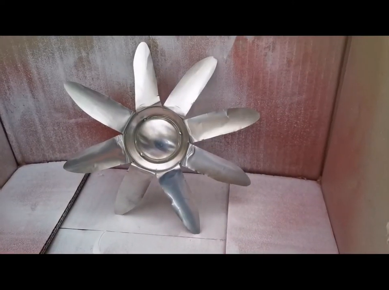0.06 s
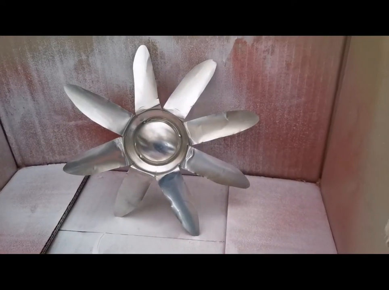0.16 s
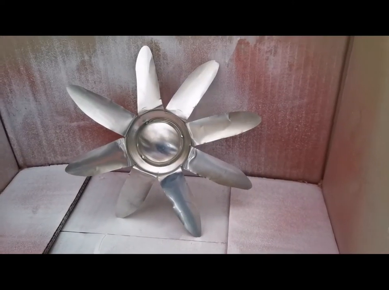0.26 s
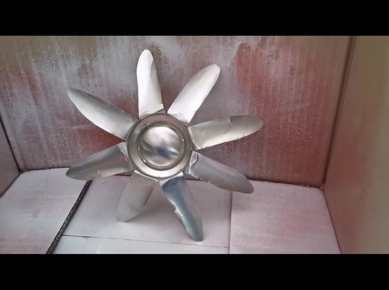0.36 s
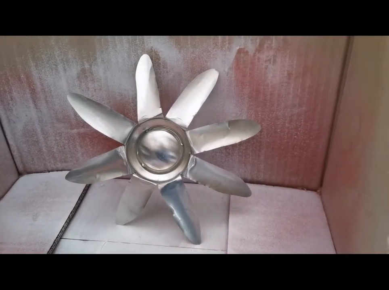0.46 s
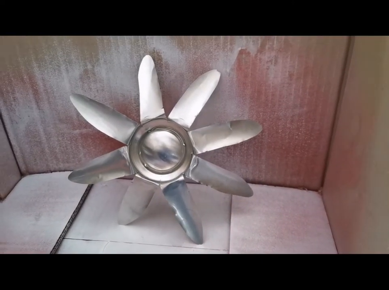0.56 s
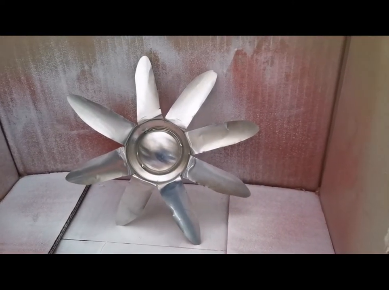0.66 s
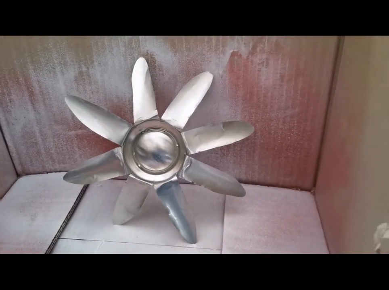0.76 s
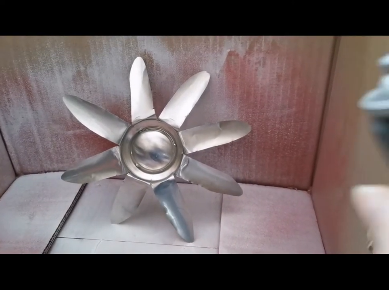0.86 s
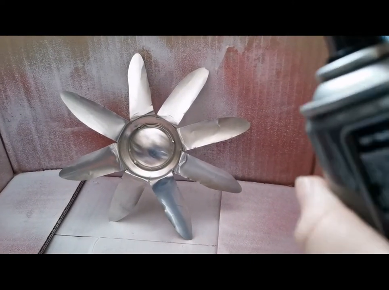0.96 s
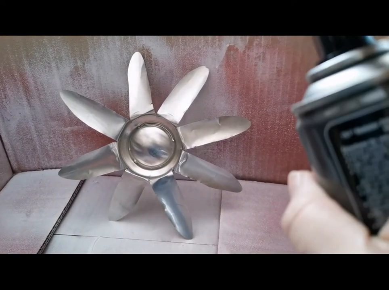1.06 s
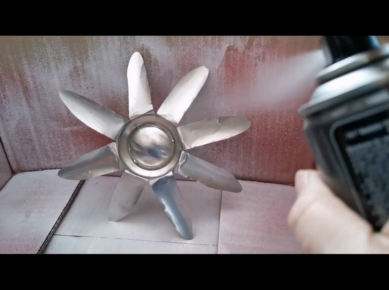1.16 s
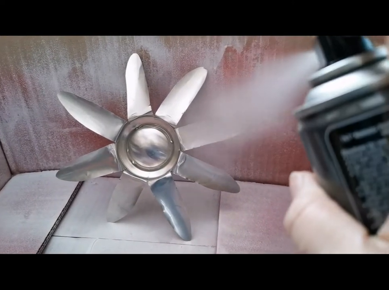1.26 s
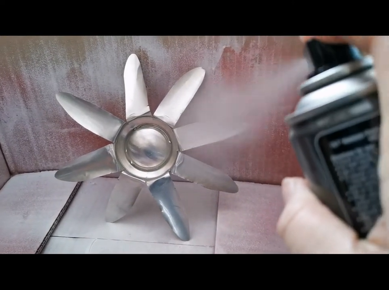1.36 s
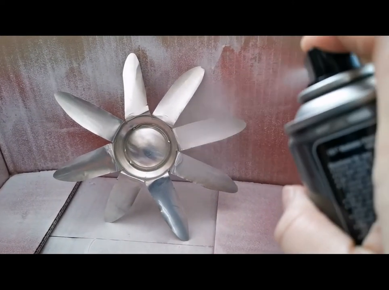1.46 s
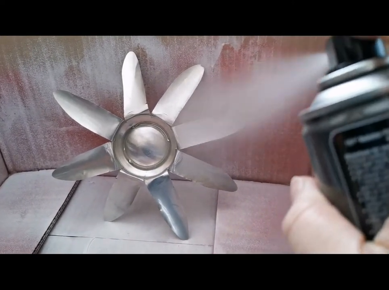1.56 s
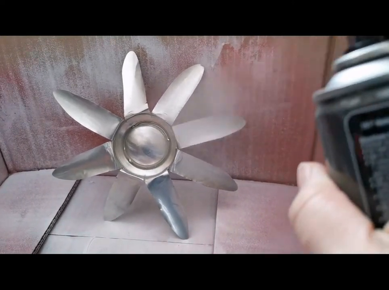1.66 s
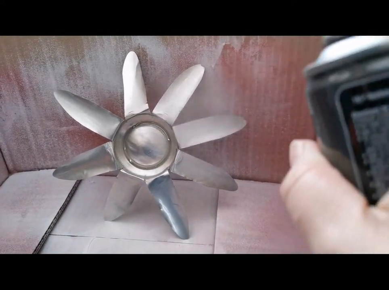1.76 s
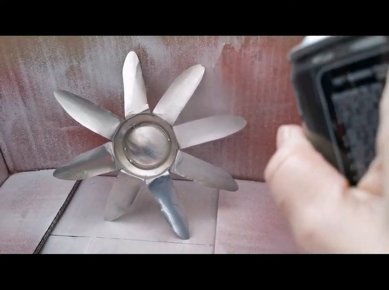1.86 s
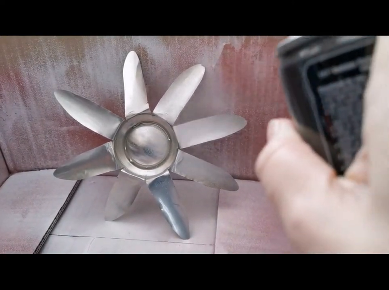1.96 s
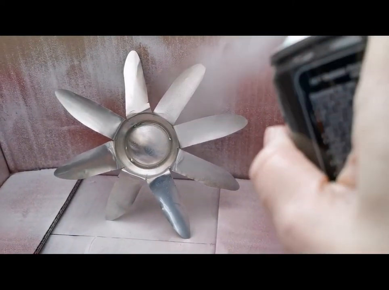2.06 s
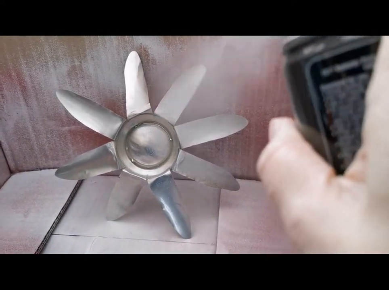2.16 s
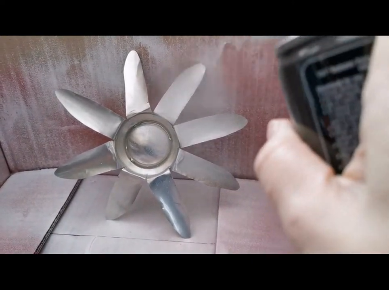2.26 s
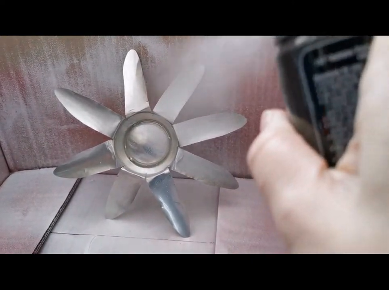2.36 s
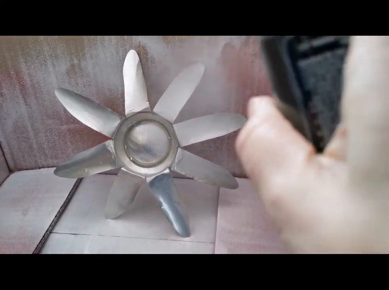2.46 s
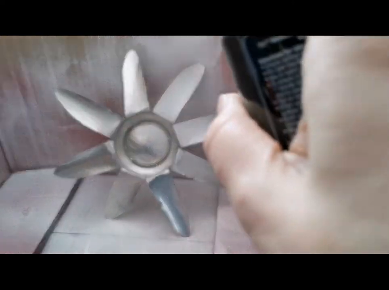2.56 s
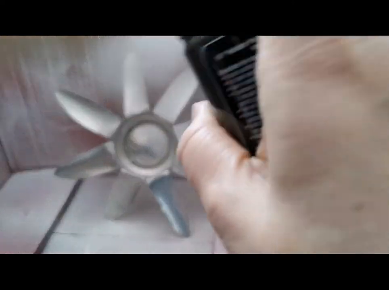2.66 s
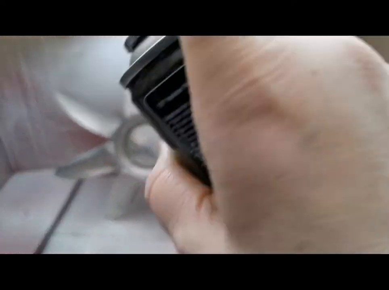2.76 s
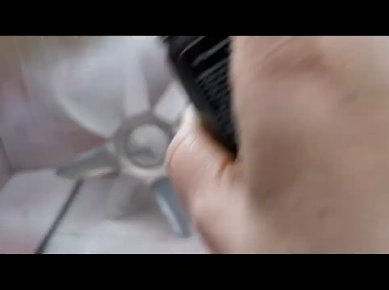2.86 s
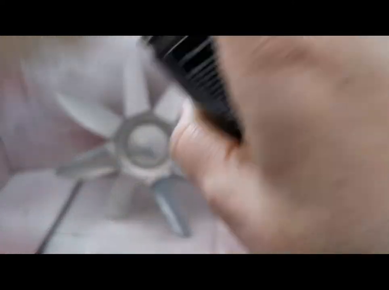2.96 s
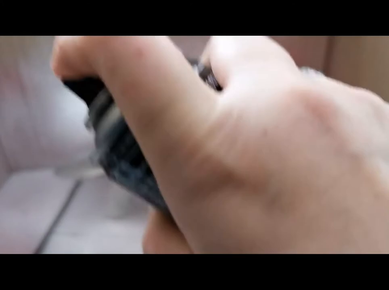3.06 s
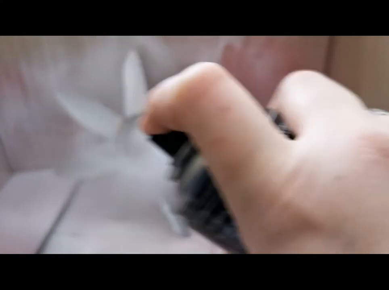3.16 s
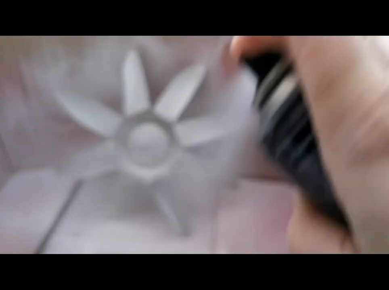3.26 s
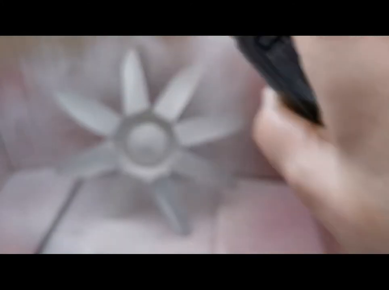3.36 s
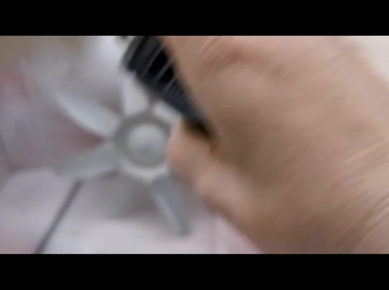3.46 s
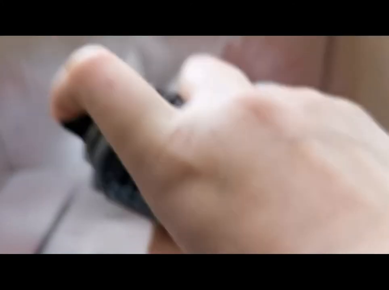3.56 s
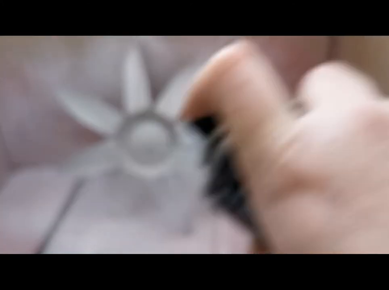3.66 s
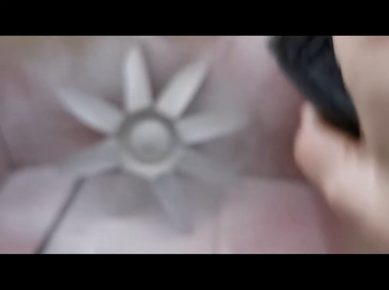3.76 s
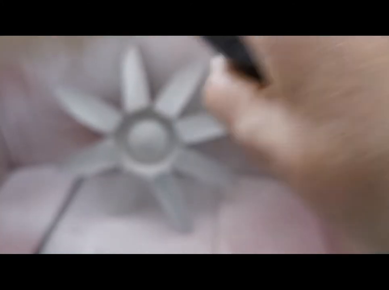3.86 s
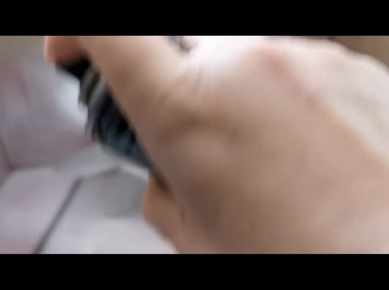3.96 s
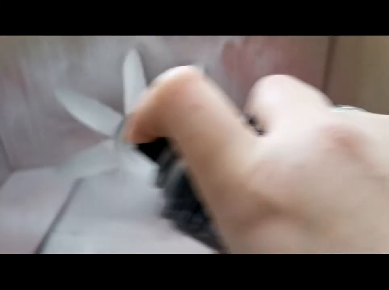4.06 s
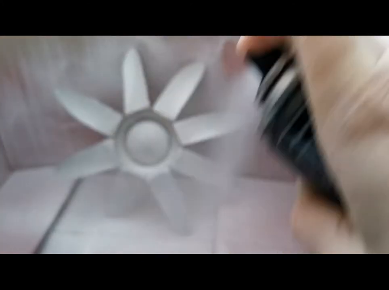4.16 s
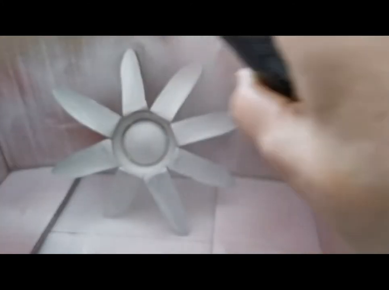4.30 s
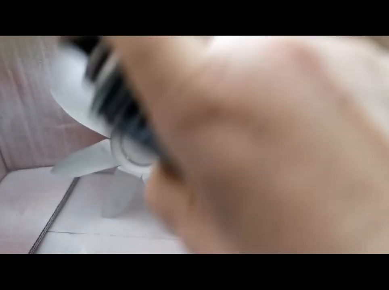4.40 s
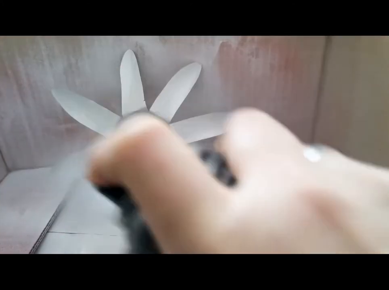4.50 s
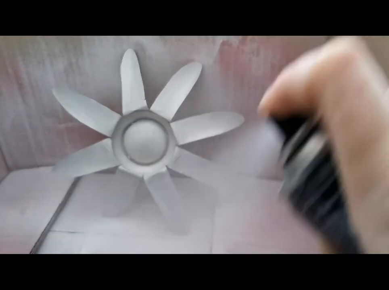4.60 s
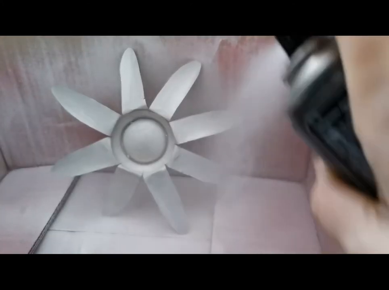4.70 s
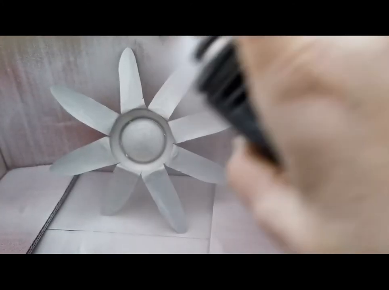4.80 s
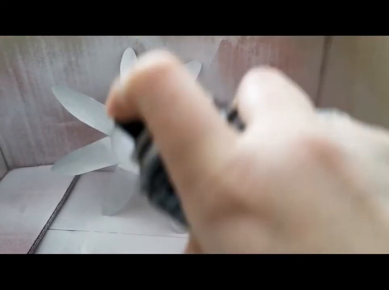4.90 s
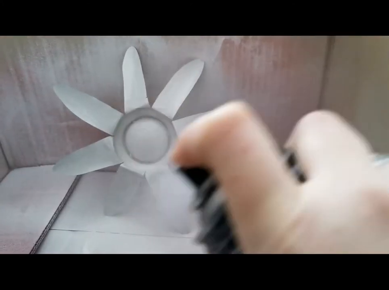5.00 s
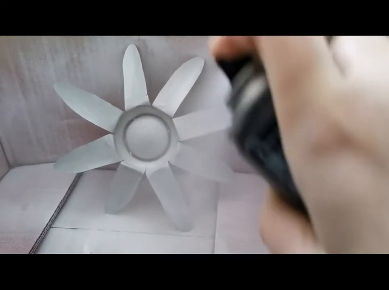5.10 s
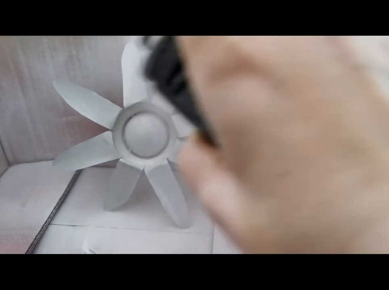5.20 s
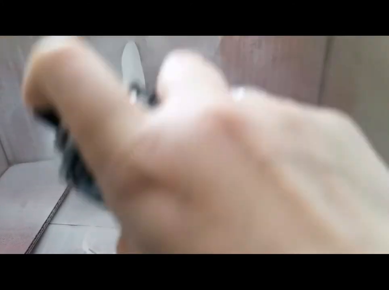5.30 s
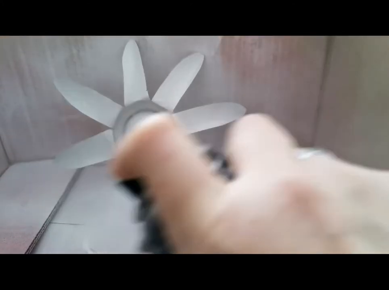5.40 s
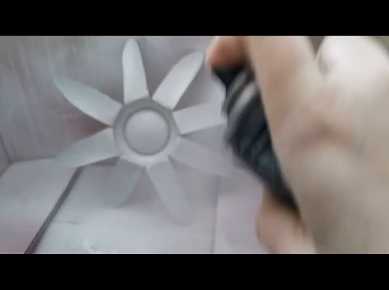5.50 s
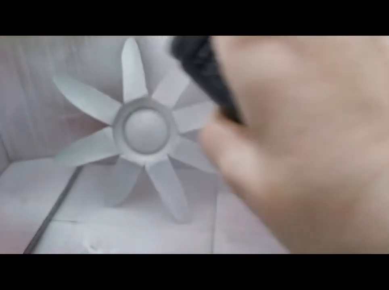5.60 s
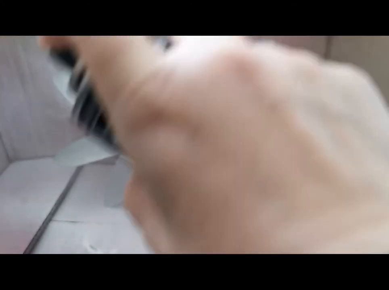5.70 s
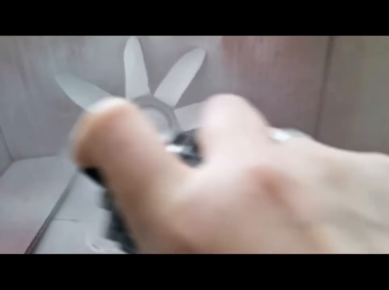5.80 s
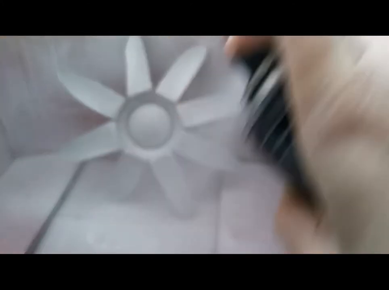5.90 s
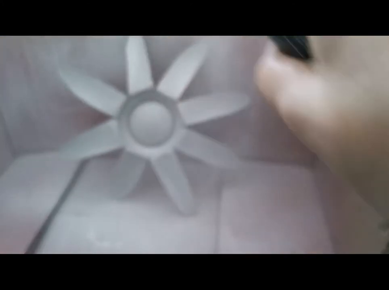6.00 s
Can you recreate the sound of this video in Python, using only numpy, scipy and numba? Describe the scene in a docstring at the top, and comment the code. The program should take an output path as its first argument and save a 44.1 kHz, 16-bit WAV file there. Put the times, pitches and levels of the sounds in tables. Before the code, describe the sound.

A spray can is shaken with a quick metallic ball rattle, gives four short hissing bursts, then sprays on steadily in sweeping strokes inside a box.

```python
"""Spray can in a cardboard box

A can is shaken so its ball rattles, gives four short bursts, then sprays on into a box, swept near a phone.
Jet: banded noise with two moving ridges, wall echoes and aimed treble; mist and buffeting: low box noise.
Ball: noise bursts, each with a rattle through can modes; slosh: flickering noise; valve: a falling whistle.
A rough squeak (narrow noise bands) leads in; hum and room noise lie under. Two ports colour jet and ball.
"""
import sys
import numpy as np
from scipy import signal
from scipy.fft import rfft, irfft
from scipy.io import wavfile
from scipy.ndimage import uniform_filter1d
from numba import njit

SR = 44100
rng = np.random.default_rng(int(sys.argv[2]) if len(sys.argv) > 2 else 0)


def digitize_waveform(pressure):
    """Quantize a signal to 16-bit integers and store it at the path in sys.argv[1].

    Rows of a 2-D input are taken as channels; values are limited to [-1, 1].
    """
    field = np.atleast_2d(pressure).T
    bounded = np.clip(field, -1, 1)
    quanta = np.round(bounded * 32767).astype(np.int16)
    wavfile.write(sys.argv[1], SR, quanta)


N = 266532


def undb(db):
    """Amplitude gain of a level in dB."""
    return 10 ** (np.asarray(db) / 20)


def unit_rms(x):
    """Scale to RMS 1, all channels together."""
    return x / np.sqrt(np.mean(x ** 2))


def colour(x, points):
    """Filter by a response of (frequency [Hz], gain [dB]) points, linear in log frequency."""
    hz, db = np.transpose(points)
    f = np.arange(N // 2 + 1) * SR / N + 1
    return irfft(rfft(x) * undb(np.interp(np.log(f), np.log(hz), db)), N)


def band(x, hz, width_hz):
    """Two-pole resonance, gain 1 at the centre."""
    return signal.lfilter(*signal.iirpeak(hz, hz / width_hz, fs=SR), x)


@njit
def sweep_band(x, hz, width_hz):
    """State-variable band-pass whose centre moves."""
    y, b, l = np.empty(len(x)), 0., 0.
    for i in range(len(x)):
        g, k = np.tan(np.pi * hz[i] / SR), width_hz / hz[i]
        v = (b + g * (x[i] - l)) / (1 + g * (g + k))
        b, l, y[i] = 2 * v - b, l + 2 * g * v, k * v
    return y


def pair(alike_below_hz):
    """Noise at two ports: alike in the bass, unrelated above; the shared part reaches the left later."""
    shared, own = rng.standard_normal(N), rng.standard_normal((2, N))
    delay_samples = 8
    both = [np.roll(shared, delay_samples), shared]
    low = signal.lfilter(*signal.butter(1, alike_below_hz, fs=SR), both)
    high = signal.lfilter(*signal.butter(1, alike_below_hz, "high", fs=SR), own)
    return low + high


def walk(rate_hz):
    """Random levels held 1 / rate_hz and smoothed twice; spread near 1."""
    hold = int(SR / rate_hz)
    steps = np.repeat(rng.standard_normal(N // hold + 1), hold)
    return 1.576 * uniform_filter1d(uniform_filter1d(steps, hold), hold)[:N]


def read(table):
    """Columns of a curve at every sample; the first, in dB, is -140 outside the curve."""
    s, first, *rest = np.transpose(table)
    t = np.arange(N) / SR
    return [np.interp(t, s, first, -140, -140)] + [np.interp(t, s, c) for c in rest]


def sides(pan_db):
    """Left and right gains for a left-minus-right level."""
    return undb(np.array([pan_db, -pan_db]) / 2)


# microphone port responses: (frequency [Hz], gain [dB])
LEFT_PORT_RESPONSE = [(1150, -20), (1450, -7), (1900, 3.5), (2500, -0.5), (3200, 0.5), (4200, 0),
                      (6000, -0.5), (7700, -2), (9000, 1.5), (9800, 3.5), (10800, 8.5), (12000, -1.5),
                      (13200, 3.5), (14000, 0.5), (15500, 2.5)]
RIGHT_PORT_RESPONSE = [(1100, -13.5), (2000, -2), (2700, 1), (3300, -1), (4800, 2), (6500, 2), (7700, -3),
                       (9000, 2), (11000, 1.5), (15500, 4)]


def ports(x):
    """Each port has its own resonances; the mean of its response points is set to 0 dB."""
    heard = []
    for channel, response in zip(x, (LEFT_PORT_RESPONSE, RIGHT_PORT_RESPONSE)):
        heard.append(colour(channel, response) * undb(-np.mean(np.array(response)[:, 1])))
    return np.array(heard)


# squeak envelope: (time [s], level [dB])
SQUEAK_LEVEL = [(0.0, -68), (0.046, -60.5), (0.08, -64), (0.102, -75), (0.14, -69)]
# squeak bands: (frequency [Hz], width [Hz], relative level [dB])
SQUEAK_PARTIALS = [(2270, 150, 2), (4170, 76, -4.5), (4960, 110, -8)]


def squeak():
    """Faint rough squeak: noise in a few narrow bands."""
    bands = [undb(db) * unit_rms(band(rng.standard_normal((2, N)), hz, width_hz))
             for hz, width_hz, db in SQUEAK_PARTIALS]
    return undb(read(SQUEAK_LEVEL)[0]) * sum(bands)


# background level and lean, drops quickly near 0.3 s, returns by 0.9 s:
# (time [s], level [dB], left minus right [dB])
BACKGROUND_LEVEL = [(0.0, -62, -5), (0.27, -60.5, 0), (0.341, -77, 1), (0.74, -70.5, -2.5),
                    (0.9, -61.5, -0.5), (1.41, -63.5, 1.5), (2.02, -59, 4.5), (2.69, -59.5, 4),
                    (2.9, -68, 3.5), (3.5, -66.5, 3), (4.9, -63, -1), (6.04, -63, -2)]
# mains hum bands: (frequency [Hz], width [Hz], relative level [dB])
HUM_BANDS = [(49.1, 5.4, 2.5), (192.8, 10, -10)]
# room noise spectrum: (frequency [Hz], gain [dB])
ROOM_SPECTRUM = [(20, -7.5), (35, -15.5), (65, -27), (120, -20), (350, -34.5), (750, -25.5), (1300, -37),
                 (4500, -42.5), (6000, -60), (16000, -58.5)]


def background():
    """Wavering mains hum, as narrow noise bands, over room noise."""
    s, *columns = np.transpose(BACKGROUND_LEVEL)
    db, pan_db = (np.interp(np.arange(N) / SR, s, c) for c in columns)
    hum = sum(undb(level_db) * unit_rms(band(rng.standard_normal(N), hz, width_hz))
              for hz, width_hz, level_db in HUM_BANDS)
    room = unit_rms(colour(pair(390), ROOM_SPECTRUM)) * undb([[1.5], [-2.5]])
    return undb(db) * sides(pan_db) * (hum + room)


# paint sloshing and ball rolling: (time [s], relative level [dB], brightest frequency [Hz])
SLOSH_CURVE = [(0.2, -81, 4330), (0.264, -44.5, 2550), (0.33, -51.5, 4110), (0.424, -33.5, 2600),
               (0.48, -55.5, 2240), (0.56, -56, 4830), (0.7, -46.5, 2500), (0.79, -69, 2700),
               (1.09, -60, 2580), (1.22, -94, 2350)]


def slosh(held_db):
    """Paint washes about under the rolling ball, which skips in sparse ticks a few ms long."""
    db, hz = read(SLOSH_CURVE)
    wash = pair(800)
    wash = wash + undb(-3.5) * np.array([sweep_band(v, hz, 1500.) for v in wash])
    skips_per_s, skip_decay_s = 180, .002
    skips = (rng.random(N) < skips_per_s / SR) * rng.exponential(size=N)
    ticks = signal.lfilter([1], [1, -np.exp(-1 / (skip_decay_s * SR))], skips)
    flicker_db = 20 * np.log10(1 + 1.6 * ticks)
    return undb(db + flicker_db + 1.0) * sides(np.maximum(held_db, 0) + 4.5) * wash


# ball against can: (time [s], relative peak [dB], crack centre [Hz], treble snap re peak before trim [dB])
BALL_KNOCKS = [(0.0446, -48, 2380, -12), (0.0638, -49, 2140, 5), (0.1886, -39.5, 4600, -18),
               (0.2505, -33, 5500, -20), (0.277, -27, 5320, -12), (0.2878, -15, 1730, 1.5),
               (0.2987, -32, 1660, 15), (0.3113, -13, 4070, -4), (0.3221, -15, 3850, -13),
               (0.3344, -24, 5650, 0), (0.3479, -30.5, 3350, 14.5), (0.3584, -28, 1590, -2),
               (0.397, -17.5, 2420, 2.5), (0.4043, -31, 2710, -6), (0.421, -32, 2890, -13),
               (0.429, -45, 2160, -11), (0.447, -23, 1640, -10), (0.467, -23.5, 1720, 1.5),
               (0.5119, -15, 1860, -9.5), (0.5299, -8.5, 4540, -11.5), (0.5368, -12, 4970, -22),
               (0.5552, -21, 2240, -13), (0.5844, -22, 3650, -1.5), (0.6012, -32.5, 2920, 7.5),
               (0.638, -10, 2120, -9), (0.6759, -16, 2930, -3), (0.6803, -22.5, 1790, -17),
               (0.7113, -39, 1710, -7), (0.7322, -26, 1800, -7), (0.7428, -32.5, 2050, -4),
               (0.7724, -32.5, 2070, -0.5), (0.809, -22.5, 2650, -8), (0.8735, -40, 2000, -8),
               (0.88, -25, 1710, -7.5), (0.907, -21, 1820, -7.5), (0.946, -30.5, 2000, -14),
               (0.9844, -25, 2720, 2), (1.015, -18.5, 2500, -10), (1.055, -29, 2840, -16),
               (1.071, -24.5, 2730, -29), (1.0822, -29, 2220, -19), (1.0944, -31, 2770, -30),
               (3.8463, -14, 2850, -1), (3.8802, -19, 4130, -11), (4.2753, -12, 2480, -4.5),
               (4.3283, -11, 4740, -5.5), (4.4692, -27, 4040, 11.5), (4.7147, -20.5, 2780, 3.5),
               (4.7527, -17, 2640, 3), (4.9456, -18, 2560, -15), (5.1527, -18.5, 2670, 3),
               (5.1915, -17.5, 2720, 3), (5.267, -14, 2560, -21), (5.5836, -13.5, 2600, 1.5),
               (5.6256, -16.5, 2900, 8.5), (5.679, -16.5, 3000, -24), (5.697, -32, 2640, -11)]
# grip, free when shaken, damped when held:
# (time [s], left minus right [dB], clatter [ms], rattle t60 [s], relative thud [dB])
CAN_GRIP = [(0.2, -1, 0.73, 0.11, -2), (0.47, 4, 0.81, 0.09, 11), (0.55, 6, 1.4, 0.13, -0.5),
            (0.9, 4, 1.2, 0.091, 1), (1.1, 9, 2.8, 0.12, -2), (3.8, 13.5, 4.1, 0.052, -18),
            (5.7, 6, 2.6, 0.047, -9)]
# can wall modes: (frequency [Hz], relative level [dB], width [Hz])
CAN_MODES = [(1750, -36, 330), (2450, -2.5, 400), (2744, 11.5, 314), (4120, -4.5, 490), (5020, 3.5, 260),
             (6980, 6.5, 500), (7600, -18, 500), (10400, 1, 800)]
# colour of rattle and slosh: (frequency [Hz], gain [dB])
CAN_COLOUR = [(250, -3), (500, 8), (1200, 9), (2500, -12), (6000, -6), (8000, -12), (11000, -15),
              (12500, -24.5), (16000, -31)]


def ball():
    """Each knock: a few ms of clatter plus a dying rattle through the can wall modes; slosh beneath."""
    hits, tails = np.zeros((2, N)), np.zeros((2, N))
    t = np.arange(int(.2 * SR)) / SR
    grip = read(CAN_GRIP)
    for s, peak_db, hz, bright_db in BALL_KNOCKS:
        at = int(max(s, .25) * SR)  # knocks before 0.25 s share one grip
        pan_db, clatter_ms, t60_s, thud_db = (c[at] for c in grip)
        noise = rng.standard_normal((2, len(t)))
        # the ball chatters against the wall, then lets go
        contact = noise * np.exp(-(t / (max(clatter_ms, .3) / 1000)) ** 3)
        crack = band(band(contact, hz, 0.49 * hz), hz, 0.49 * hz)
        snap = band(band(contact, 6000, 9000), 6000, 9000)
        knock = crack / np.abs(crack).max() + undb(bright_db - 3.0) * snap / np.abs(snap).max()
        # the full can answers with a dull thud
        knock = knock + undb(thud_db) * band(contact[0], 650, 500)
        shake = noise[::-1] * np.exp(-np.log(1000) * t / max(t60_s, .01))
        # modes near the crack centre are struck hardest: -19 dB per octave away
        ring = sum(undb(db - 19.0 * abs(np.log2(f / hz))) * band(shake, f, width_hz)
                   for f, db, width_hz in CAN_MODES)
        # the box returns more of the rattle to the left port
        rattle = undb([[-13.0], [-19.0]]) * (undb(12.5) * ring + undb(bright_db + 6.5) * shake)
        i, gain = int(s * SR), undb(peak_db) * sides(pan_db)[:, None]
        hits[:, i:i + len(t)] += (knock * gain)[:, :N - i]
        tails[:, i:i + len(t)] += (rattle * gain)[:, :N - i]
    tails = tails + slosh(grip[0])
    heard = ports(undb(-4.5) * hits + undb(2.0) * colour(tails, CAN_COLOUR))
    return heard * undb([[-3.0], [2.5]])


# finger on nozzle: (valve opens [s], finger lets go [s], hiss before swing and trim [dB],
# time to full flow [s], first leak re full flow [dB])
NOZZLE_PRESSES = [(1.253, 1.479, -40, .12, -16), (1.604, 1.733, -38.5, .03, -26),
                  (2.148, 2.314, -37, .022, -5.5), (2.407, 2.547, -34, 0.028, -19),
                  (2.67, 6.5, -32.5, 0.034, -17)]
FADE_DB_S, SHUT_DB_S2 = 142, 1495  # steady fade once let go; ever faster as the valve shuts
SAG_DB, RECOVER_S, CRACK_S = -0.5, 0.075, 0.013  # dip after the rush, its length; valve cracking open
DRIBBLE_DB, DRIBBLE_FADE_DB_S = -14.5, 146  # gas left in the nozzle seeps out after the valve has shut


def flow():
    """Hiss level of all presses: rush, sag, recover, fade [dB]."""
    t, db = np.arange(N) / SR, np.full(N, -140.)
    for opens_s, lets_go_s, full_db, rise_s, leak_db in NOZZLE_PRESSES:
        since = t - opens_s
        rise = leak_db * np.clip(1 - since / rise_s, 0, 1) ** 0.95
        crack = 20 * np.log10(np.clip(since / CRACK_S, 1e-3, 1))
        sag = SAG_DB * np.sin(np.pi * np.clip((since - rise_s) / RECOVER_S, 0, 1))
        late = np.maximum(t - lets_go_s, 0)
        shut = -FADE_DB_S * late - SHUT_DB_S2 * late ** 2
        fade = np.maximum(shut, DRIBBLE_DB - DRIBBLE_FADE_DB_S * late)
        db = np.where(t > opens_s, np.maximum(db, full_db + rise + crack + sag + fade), db)
    return db


# wander of the spraying can: (time [s], path change per unit of random walk [m])
CAN_WANDER = [(2.6, .003), (2.9, .05)]
# jet echoes: (extra path at left port [m], relative level [dB])
WALL_ECHOES = [(.26, -10), (.49, -10), (.63, -11), (.9, -12), (1.14, -12), (1.38, -12), (1.9, -13)]


def box_walls(x):
    """Echoes inside the box comb the sound; the combs slide as the can moves."""
    n = np.arange(N)
    wander_m = np.interp(n / SR, *np.transpose(CAN_WANDER))
    fine = signal.resample_poly(x, 4, 1, axis=1)  # 4x oversampled for fractional lags
    out = x.copy()
    for path_m, db in WALL_ECHOES:
        for port in range(2):
            lag = (path_m * (1 + .08 * port) + wander_m * walk(7)) / 343 * SR
            out[port] += undb(db) * np.interp(4 * (n - lag), np.arange(4 * N), fine[port])
    return out


# upper ridge: (time [s], level re hiss before port trim [dB], frequency [Hz])
UPPER_RIDGE = [(1.2, 3, 4130), (1.8, -3, 4080), (2.15, 6.5, 3920), (2.6, -4, 3800), (2.8, 5, 4260),
               (3.3, -3, 4320), (3.9, -7, 4400), (4.5, -8, 4040), (6.05, -5, 4600)]
RIDGE_WANDER_HZ, RIDGE_FLICKER_DB = 40, 1.5
TREBLE_DB, TREBLE_PER_AIM_DB = -10, 8  # fades in over band centres from 7.1 to 12.2 kHz


def jet(hiss_db, aim, ridge_hz):
    """Turbulent hiss with two moving ridges, in half-octave-spaced bands that flicker a little."""
    direct = pair(1580)
    hiss = unit_rms(box_walls(direct))
    ridge_hz = ridge_hz + RIDGE_WANDER_HZ * walk(23.98)
    flicker = undb(RIDGE_FLICKER_DB * walk(20))
    ridge = flicker * np.array([sweep_band(sweep_band(v, ridge_hz, 484.0), ridge_hz, 484.0)
                                for v in unit_rms(direct)])
    upper_db, upper_hz = read(UPPER_RIDGE)
    upper = undb(upper_db) * np.array([sweep_band(v, upper_hz, 145.0) for v in hiss])
    hiss = hiss + undb([[9.0], [-4.0]]) * ridge + undb([[0.0], [-9.0]]) * upper
    spectrum, surge = rfft(ports(hiss)), walk(24.81)
    octave = np.log2(np.arange(N // 2 + 1) * SR / N + 1)
    out = 0
    for centre in np.arange(7, 14.6, .5):  # log2 Hz
        # treble is beamed along the jet, so it follows the aim of the nozzle
        beamed = np.clip((centre - 12.8) / 0.77, 0, 1)
        treble_db = beamed * (TREBLE_DB + TREBLE_PER_AIM_DB * aim)
        db = hiss_db + treble_db + 1.05 * walk(8.9) + 0.83 * surge
        out = out + undb(db) * irfft(spectrum * np.clip(1 - 2 * abs(octave - centre), 0, 1), N)
    return out


# mist drumming: (time [s], level re hiss [dB])
MIST_LEVEL = [(1.25, -21.5), (2.79, -25.5), (2.84, -16.5), (3.17, -16.5), (3.21, -22.5), (3.41, -18.5),
              (3.7, -20.5), (3.79, -33), (3.94, -24), (4.05, -19.5), (4.18, -27), (4.36, -22),
              (4.61, -23.5), (4.78, -19), (5.03, -23), (5.4, -19.5), (5.48, -27), (5.6, -21.5),
              (6.05, -24.5)]
# jet crossing a box flap: (time [s], boost of drumming [dB])
FLAP_GUSTS = [(4.278, 10), (4.651, 10.5), (5.09, 11), (5.57, 9), (5.978, 12)]
# box response: (frequency [Hz], gain [dB])
BOX_RESPONSE = [(300, -8.5), (420, -6), (600, 3), (900, -4), (1400, -3.5), (3000, -30)]
# buffeting spectrum: (frequency [Hz], gain [dB])
BUFFET_SPECTRUM = [(40, -38), (90, -26), (200, 10.5), (320, 4), (450, -56)]
GUST_S = 0.016
BUFFET_DB, BUFFET_SLOPE = -29.5, 1.63  # re hiss when drumming is 20 dB down; dB per dB of drumming


def mist(hiss_db, pan_db):
    """Mist drums on and buffets the cardboard; the jet thumps a flap as it crosses."""
    t = np.arange(N) / SR
    gust_db = sum(db * np.exp(-((t - s) / GUST_S) ** 2) for s, db in FLAP_GUSTS)
    mist_db = read(MIST_LEVEL)[0] + gust_db
    box_db = hiss_db + mist_db + 2.16 * walk(30)
    buffet_db = hiss_db + BUFFET_DB + BUFFET_SLOPE * (mist_db + 20) + 1.7 * walk(30)
    box = unit_rms(colour(pair(1500), BOX_RESPONSE)) * undb(box_db) * sides(0.65 * pan_db)
    buffet = unit_rms(colour(pair(1300), BUFFET_SPECTRUM)) * undb(buffet_db) * sides(0.034 * pan_db)
    return box + buffet


# valve whistle: (time [s], level [dB], pitch [Hz])
VALVE_WHISTLE = [(1.85, -79, 9500), (1.862, -76, 8300), (1.9, -88, 5800)]


def whistle(pan_db):
    """The valve whistles downward as it shuts: noise in a falling band."""
    db, hz = read(VALVE_WHISTLE)
    return undb(db) * unit_rms(sweep_band(pair(1580)[0], hz, 300.0)) * sides(pan_db)


# hand swing: (time [s], aim [0 away - 1 toward phone], hiss ridge before wander [Hz], hiss change [dB])
HAND_SWING = [(1.25, 0.8, 2590, 4), (1.8, 0.75, 2510, 0.5), (2.15, 0.68, 2550, 1.5), (2.4, 0.66, 2540, 1.5),
              (2.7, .5, 2440, -0.5), (2.78, 0.56, 2550, 0), (2.9, 0.55, 2300, -0.1), (3.2, 0.76, 2360, 0.2),
              (3.4, 0.3, 2570, 1.03), (3.67, 0.54, 2350, 0.2), (3.8, 1, 2650, -4.5),
              (3.9, 0.14, 2500, -1.5), (4.12, 0.89, 2300, -2), (4.19, 1, 2560, -2.5),
              (4.35, .05, 2500, -0.5), (4.62, 0.88, 2240, -0.1), (4.8, 0.16, 2560, 1.4),
              (5.04, 0.77, 2420, -0.5), (5.22, 0.075, 2570, 1.2), (5.46, 0.72, 2350, 1.2),
              (5.68, 0.13, 2620, .3), (5.88, 0.7, 2310, 0), (6.05, 0.64, 2800, -1.2)]
PAN_DB, PAN_PER_AIM_DB = 7.5, 3.5  # left minus right


def spray():
    """Jet, mist and valve whistle, steered by the finger and the swinging hand."""
    aim, ridge_hz, swing_db = read(HAND_SWING)
    aim = np.clip(aim, 0, 1)
    hiss_db = flow() + swing_db
    pan_db = PAN_DB + PAN_PER_AIM_DB * aim
    hiss = undb(2.0) * jet(hiss_db, aim, ridge_hz) * sides(pan_db)
    return hiss + mist(hiss_db, pan_db) + whistle(pan_db)


def scene():
    """Sum of all layers."""
    return squeak() + background() + ball() + spray()


def record(dry):
    """Steep elliptic low-pass: nothing above about 16 kHz."""
    cutoff_hz = 15850
    return signal.sosfilt(signal.ellip(10, .2, 60, cutoff_hz, fs=SR, output="sos"), dry)


dry = scene()
out = record(dry)
digitize_waveform(out)
```